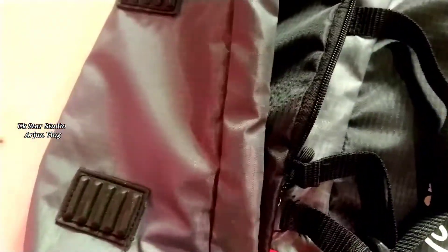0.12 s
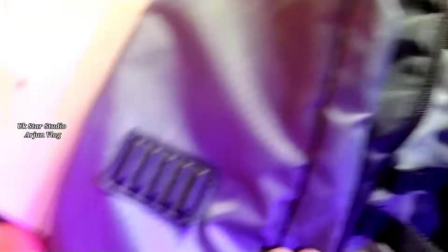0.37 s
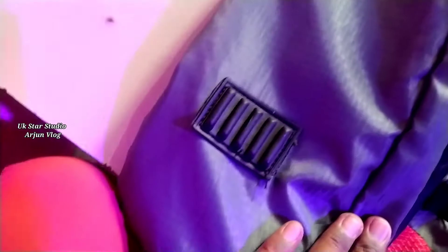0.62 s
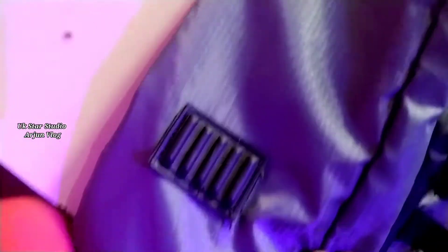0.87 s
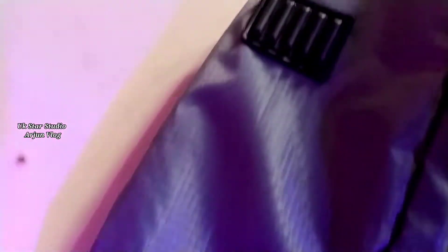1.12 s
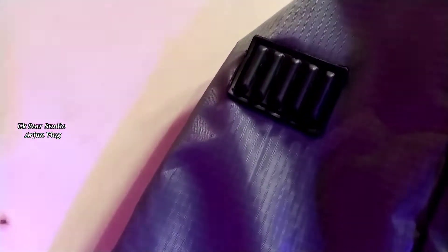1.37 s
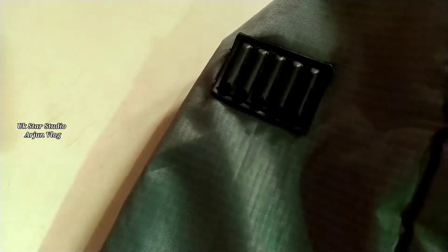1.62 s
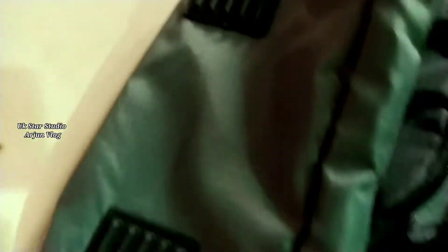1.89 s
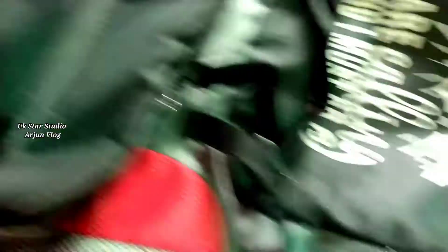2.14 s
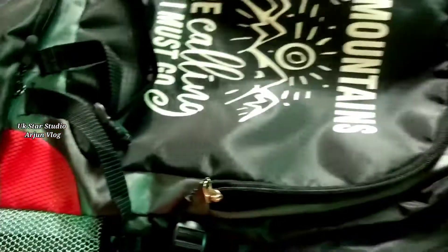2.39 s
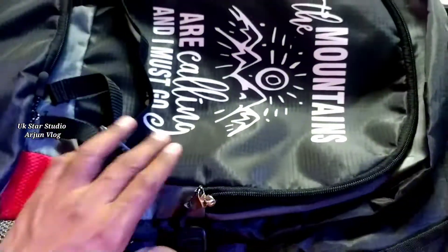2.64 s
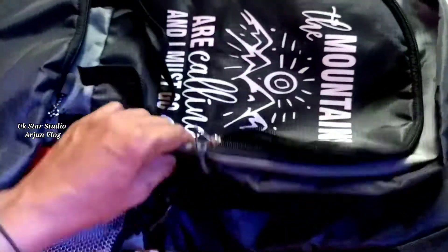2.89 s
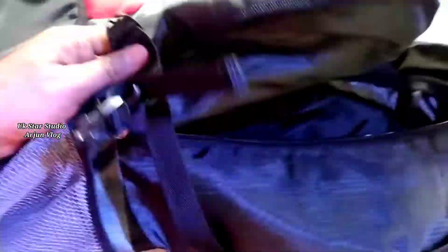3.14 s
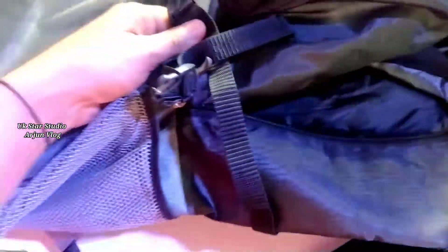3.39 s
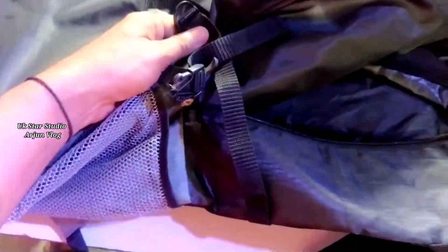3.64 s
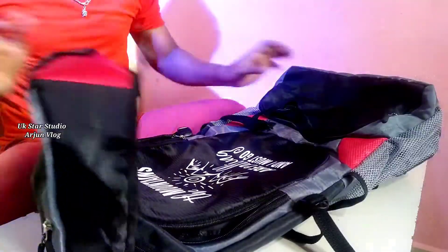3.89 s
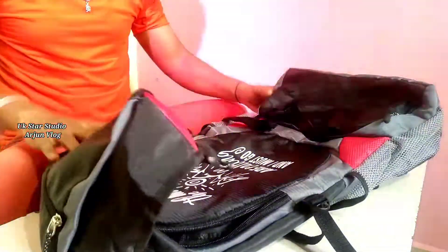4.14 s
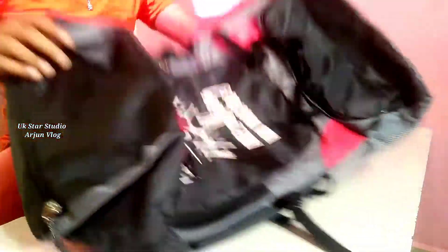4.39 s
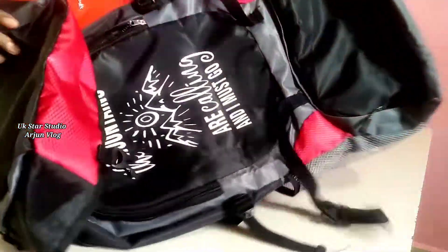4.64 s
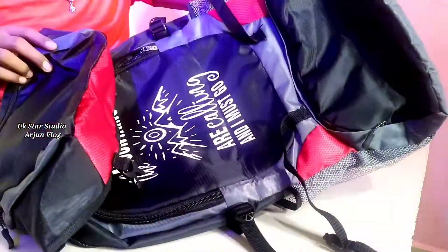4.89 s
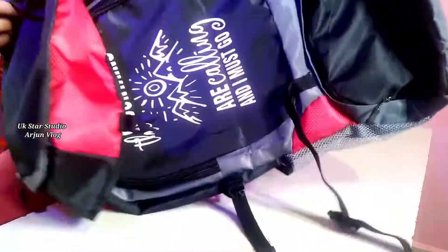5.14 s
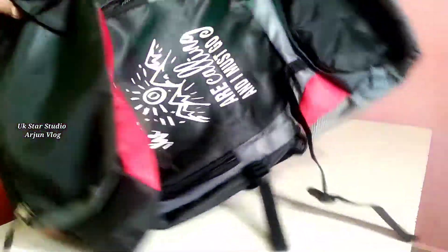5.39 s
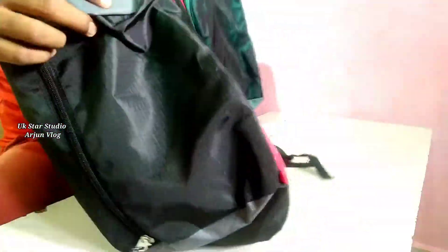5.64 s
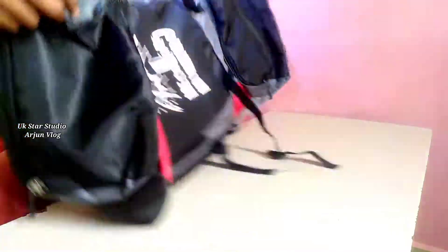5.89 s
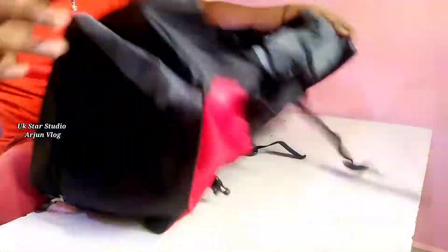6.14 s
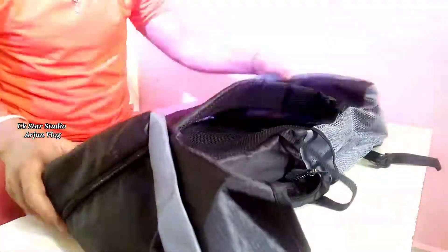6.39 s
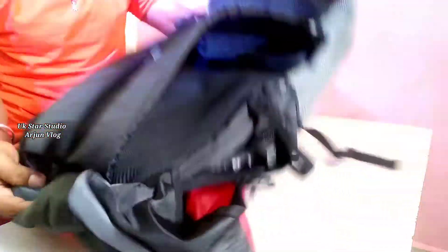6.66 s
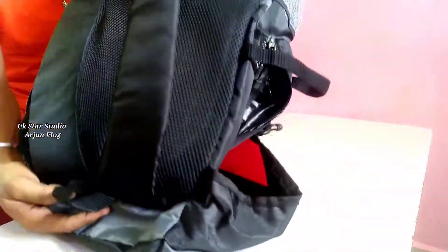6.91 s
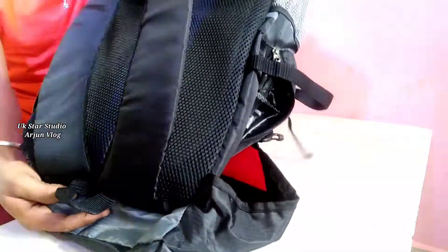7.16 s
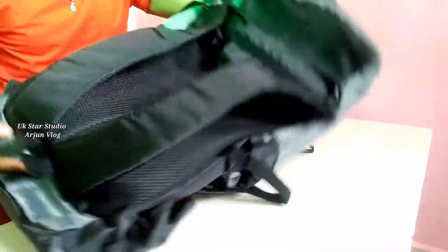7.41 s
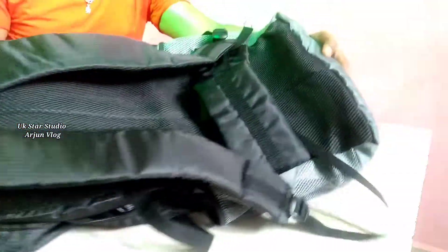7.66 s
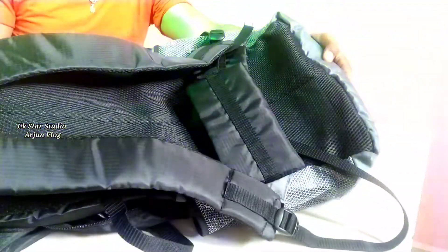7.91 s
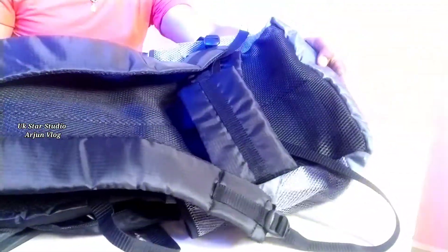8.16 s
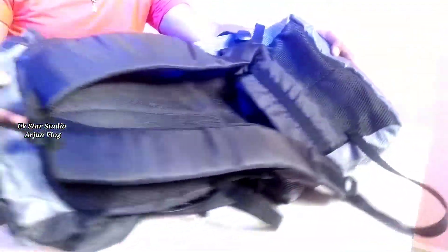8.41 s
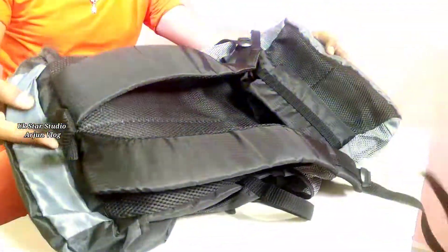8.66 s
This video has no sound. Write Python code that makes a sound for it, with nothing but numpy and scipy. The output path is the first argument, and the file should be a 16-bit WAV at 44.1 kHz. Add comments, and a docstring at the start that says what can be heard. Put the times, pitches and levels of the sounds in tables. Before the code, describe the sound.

A nylon bag rustles and creases under moving hands, first slowed and low, then faster and crisper, with buckle knocks and zip-pull clicks on a table.

```python
"""A nylon bag is turned and opened by hand on a hard table in a small bare room, heard by two microphones.
Stick-slip clicks excite bag body, creases and weave; blows of bag, buckles and zip pulls are filtered pulses.
Sparse decaying reflections form the room, over shaped noise for its air and a low machine drone.
The first stretch plays slowed down, so its handling sounds lower and its tails last longer."""
import sys
import numpy as np
from scipy import signal
from scipy.fft import rfft, irfft
from scipy.io import wavfile
from scipy.ndimage import uniform_filter1d

SR = 44100
rng = np.random.default_rng(int(sys.argv[2]) if len(sys.argv) > 2 else 0)


def file_out(sig):
    """Save sig as 16-bit WAV at sys.argv[1]."""
    # one column per channel
    cols = np.atleast_2d(sig).T
    # limit, then scale
    lim = np.clip(cols, -1, 1)
    pcm = np.round(lim * 32767).astype(np.int16)
    wavfile.write(sys.argv[1], SR, pcm)


def undo_db(level):
    """Turn decibels back into plain size, where 20 dB means ten times bigger."""
    steps = np.asarray(level, float) / 20
    return 10 ** steps


N = 387198
CUT_S = 3.86  # the slowed stretch gives way to full speed


def read(points, hz, column=1):
    """Pitch-like scaling: a table column is interpolated along log frequency."""
    columns = np.transpose(points)
    return np.interp(np.log(hz + 1), np.log(columns[0] + 1), columns[column])


def evened(x):
    """Power normalization: scales a signal to rms 1."""
    return x / np.sqrt(np.mean(x ** 2) + 1e-20)


def colour(points, pace):
    """Minimum phase: the Hilbert transform of log gain gives a causal impulse response, here of energy 1."""
    hz = abs(np.fft.fftfreq(8192, 1 / SR)) / pace
    log_gain = np.log(undo_db(read(points, hz)))
    spectrum = np.exp(np.conj(signal.hilbert(log_gain)))
    taps = np.fft.ifft(spectrum).real[:4096]
    return taps / np.linalg.norm(taps)


def paired(two, pace):
    """Spatial coherence: blends two unrelated channels so that they agree more in the bass."""
    # left-right coherence: (frequency at full speed [Hz], likeness [0 to 1])
    likeness = [(60, 0.53), (300, 0.64), (640, 0.86), (1400, 0.13), (2500, 0.14)]
    left, other = rfft(two, axis=1)
    hz = np.fft.rfftfreq(two.shape[1], 1 / SR) / pace
    same = np.clip(read(likeness, hz), 0, 1)
    right = same * left + np.sqrt(1 - same ** 2) * other
    return irfft([left, right], two.shape[1], axis=1)


def crackle(per_s, spread_db):
    """Stick-slip: fibres catch and let go in random clicks, a few of them large."""
    size_db = spread_db * np.minimum(rng.exponential(1, N), 5)
    clicks = undo_db(size_db) * rng.choice([-1., 1.], N)
    return evened(clicks * (rng.random(N) < per_s / SR))


def rubbing(mix_db, pace):
    """Friction: separate slip trains for body, creases and weave share the movement of the hand."""
    # hand movement: (time [s], rustle level [dB], extra weight on the table [dB])
    hand = [(0, -65, -2.5), (.15, -67, 4), (.25, -52.5, -2), (.31, -52, 5), (.4, -55, -2.5),
            (.55, -61, 1.5), (.8, -72.5, 1.5), (1.27, -70.5, 1.5), (1.83, -74, -1), (1.92, -56, 0.5),
            (2.0, -56, -1), (2.05, -47.5, -10.5), (2.16, -56.5, -4), (2.28, -56.5, 3.5),
            (2.399, -54.5, 1.5), (2.52, -64, -9.5), (2.74, -62.5, -5), (2.79, -53.5, 1), (2.86, -44.5, 0),
            (2.95, -46, 1), (3.25, -56.5, 2.5), (3.4, -61, 1.5), (3.8, -61.5, -1.5), (3.88, -64.5, -6),
            (4.07, -73, 10.5), (4.153, -54, 6.5), (4.23, -70, -1), (4.328, -52.5, 0.5), (4.5, -57.5, -3.5),
            (4.65, -60.5, 10), (4.85, -73, 0), (5.08, -75, 5), (5.14, -56.5, 2), (5.22, -56, 0),
            (5.31, -72, 0), (5.43, -60.5, -0.5), (5.75, -57, -4), (6.02, -63, 4.5), (6.11, -55, 5.5),
            (6.23, -56.5, -5), (6.47, -55.5, 2.5), (6.62, -53, 8), (6.78, -53.5, -1.5), (7.0, -64, -2),
            (7.23, -82, 5.5), (7.32, -56, -4), (7.48, -53, -0.5), (7.62, -54, 0), (7.86, -64, -2),
            (7.99, -86, 6), (8.12, -68.5, 2.5), (8.27, -75, 2), (8.36, -60.5, -5), (8.51, -51.5, -13),
            (8.68, -63.5, -8), (8.78, -66, 3)]
    rest_db = -55
    follow = 0.82, 1.4, 1  # share of the rustle's swing around rest taken by body, creases, weave
    fold_share = 0.44  # weight also deepens the creases
    time_s, rustle_db, weight_db = np.transpose(hand)
    t = np.arange(N) / SR
    levels_db = [rest_db + db + share * (rustle_db - rest_db) for db, share in zip(mix_db, follow)]
    levels_db[0] += weight_db
    levels_db[1] += fold_share * weight_db
    jerks = uniform_filter1d(rng.standard_normal((4, N)), round(SR * 0.03 / pace), axis=1)
    uneven = undo_db(1.6 * evened(jerks[0]) + 2.0 * evened(jerks[1:]))  # partly shared, partly each layer's own
    slips = [
        crackle(1500 * pace, spread_db=3.5),
        crackle(4000 * pace, spread_db=4.5),
        crackle(8000 * pace, spread_db=4.5),
    ]
    return [undo_db(np.interp(t, time_s, db)) * jerk * slip for db, jerk, slip in zip(levels_db, uneven, slips)]


def walls(pace, wet_db):
    """Reverberation: direct sound plus sparse reflections, each band decaying at its own rate."""
    # room decay: (frequency at full speed [Hz], t60 at full speed [s], relative starting level [dB])
    decay = [(150, 0.45, -11), (485, 0.27, 2.5), (1520, 0.24, -2.5), (3960, 0.17, -0.5),
             (11900, 0.19, -3.5)]
    lag_s = 9e-5  # at full speed: the source is nearer the right microphone
    taps = np.zeros((2, SR))
    # one reflection in every 20 samples
    at = np.arange(100, SR - 20, 20) + rng.integers(0, 20, (2, (SR - 101) // 20))
    np.put_along_axis(taps, at, rng.choice([-1., 1.], at.shape), 1)
    hz, t, z = signal.stft(taps, SR, nperseg=256)
    t60_s = read(decay, hz / pace)[:, None]
    start_db = read(decay, hz / pace, column=2)[:, None]
    tail = signal.istft(z * undo_db(start_db - 60 * t * pace / t60_s), SR, nperseg=256)[1]
    tail = paired(tail, pace)
    tail *= undo_db(wet_db) / np.linalg.norm(tail, axis=1, keepdims=True)  # energy against the direct sound
    tail[0, round(lag_s * SR / pace)] += 1
    tail[1, 0] += 1
    return tail / np.linalg.norm(tail[0])


def room(dry, pace, wet_db):
    """Changing image sources: the bag shifts about, so its sound drifts among three sets of reflections."""
    turn = 2 * np.pi * 3.0 * pace * np.arange(N) / SR  # 3 turns a second at full speed
    heard = 0
    for k in range(3):
        share = (1 + np.cos(turn + 2 * np.pi * k / 3)) / 3
        heard = heard + signal.fftconvolve((dry * share)[None], walls(pace, wet_db), axes=1)[:, :N]
    return heard


def air(points, db, pace):
    """Broadband noise: steady room air with a shaped spectrum, gently patchy in time and frequency."""
    frames, hz = N // 512 + 5, np.fft.rfftfreq(2048, 1 / SR)
    a, b, c, d, patches = rng.standard_normal((frames, 1025, 5)).T
    patches = uniform_filter1d(patches, 8, 0)
    patches = evened(uniform_filter1d(patches, 10, 1))
    gain = undo_db(read(points, hz)[:, None] + 2.0 * patches)
    z = np.array([a + 1j * b, c + 1j * d]) * gain
    noise = signal.istft(z, nperseg=2048, noverlap=1536)[1][:, :N]
    return undo_db(db) * evened(paired(noise, pace))


def drone(db, pace):
    """Narrow-band noise: a distant machine's low drone wanders in level, alike in both microphones."""
    hz, width_hz = 68 * pace, 7.2 * pace
    r = np.exp(-np.pi * width_hz / SR)
    noise = rng.standard_normal(N) + 1j * rng.standard_normal(N)
    swing = signal.lfilter([1], np.convolve([1, -r], [1, -r]), noise)
    carrier = np.exp(2j * np.pi * hz * np.arange(N) / SR)
    return undo_db(db) * evened((swing * carrier).real)


def blows(pace):
    """Impact: gathers the blows of the stretch at this speed, each with the pitch of its struck part."""
    # Blows on the table, in three tables with the same columns: (time [s], crack drive [dB],
    # body [dB re crack drive], tick [dB re crack drive], rattle [dB re push])
    # the padded bag bumps the table
    bumps = [(0.286, -34.5, 1, 4, -20.5), (0.386, -27, -4, -24, -36), (1.964, -39.5, 6, -13, -24),
             (1.991, -48, -32, -4, -42), (2.43, -46, 11, -20, -31), (2.815, -29.5, 0, -12, -24),
             (2.85, -31.5, 1.5, -2, -13), (2.896, -30.5, -13, 16, -21.5), (4.0901, -43, 3.5, -28, -17),
             (4.256, -49.5, 8.5, -20, -11.5), (4.4565, -38, -3, -25, -25), (6.5145, -38, -2.5, 5, -13.5),
             (6.5857, -35.5, 2, -8.5, -11.5), (6.6617, -31.5, -4, -13, -32), (6.6876, -32, -11, -9, -30),
             (7.2714, -49.5, 1, -23, -15.5)]
    # plastic buckles knock
    buckles = [(2.125, -27.5, -1, -25, -42), (2.183, -16, -10.5, -32, -44), (2.76, -43, -31, -9, -20),
               (4.5609, -31.5, -12, 17, -23), (4.714, -18, -6, -43, -14), (5.3817, -43.5, -19, 12, -14),
               (6.0406, -31.5, -15, 14.5, -19.5), (6.2596, -16, -4, -40, -15), (6.3244, -21, -32, -27, -24),
               (7.4205, -19.5, -11.5, 9, -18), (7.8974, -40, -2, 11.5, -25.5)]
    # metal zip pulls click
    pulls = [(0.657, -46, -11, 14, -28), (1.56, -41, -25, -32, -23), (2.391, -55, -6, 21, -34),
             (5.2958, -29, -23, 20.5, -24), (5.6153, -18.5, -11.5, 9, -20.5), (6.045, -22.5, -32, -10, -18),
             (6.1494, -18.5, -12.5, 2.5, -18), (6.283, -15.5, -20, 0, -16.5), (6.3672, -22.5, -7, 7, -14),
             (6.4454, -40, -21, 20.5, -23), (7.0798, -64, 6, 31.5, -22), (7.3886, -23.5, -12.5, 1, -11)]
    parts = (bumps, 990), (buckles, 2590), (pulls, 4640)  # crack pitch at full speed [Hz]
    return [(*row, hz * pace) for rows, hz in parts for row in rows if (row[0] < CUT_S) == (pace < 1)]


def knocks(rows, pace):
    """Impulse and resonance: a first touch, one sharp push with its thud, a grainy rattle of the loose part."""
    t = np.arange(round(.08 * SR / pace)) * pace / SR  # time at full speed
    grain, size = rng.standard_normal((2, len(rows), len(t)))
    rattles = grain * undo_db(4 * size - 60 * t / .04)  # falls 60 dB in 40 ms at full speed
    push = round(.0012 * SR / pace)  # the push follows the first touch
    drives = np.zeros((4, N))
    for (s, crack_db, body_db, tick_db, rattle_db, hz), rattle in zip(rows, rattles):
        blow = undo_db(rattle_db) * rattle
        blow[push] = 1
        blow *= undo_db(crack_db) * np.sqrt(SR / 4000)
        # the struck part favours its own pitch
        crack = signal.lfilter(*signal.iirpeak(hz, 1, SR), blow) + .12 * blow
        crack *= np.linalg.norm(blow) / np.linalg.norm(crack)
        at = round(s * SR)
        drives[:3, at:at + len(t)] += [undo_db(body_db) * blow, crack, undo_db(tick_db) * blow]
        drives[3, at + push] += undo_db(body_db) * blow[push]  # thud
    return drives


def stretch(mix_db, pace, rub_wet_db, blow_wet_db):
    """Source and filter: rubbing and blows at one speed; rubbing spreads over the whole bag, so it is wetter."""
    # Response spectra, in four tables: (frequency at full speed [Hz], relative level [dB per Hz])
    # bag body
    body = [(90, -36), (135, -3), (200, -13.5), (340, -6.5), (420, -4.5), (520, -2), (610, -5.5), (720, -4),
            (860, -1.5), (960, -21), (1500, -37), (3000, -31)]
    # creasing cloth
    crease = [(400, -35), (900, -2), (1500, 0), (2300, -1), (3400, -2), (4800, -2), (5600, -6),
              (12000, -9.5)]
    # hiss of the weave
    weave = [(1500, -16), (4000, -3), (6500, -3.5), (9000, -6), (12000, -2), (15000, 4.5), (19000, 4)]
    # the padded table gives way once, without ringing
    thud = [(90, -16), (140, -8), (230, -15.5), (450, 4), (1600, -25.5)]

    def heard(drives, wet_db):
        """Convolution: colours the drives and puts them in the room."""
        layers = zip(drives, (body, crease, weave, thud))  # rubbing has no thud
        bag = sum(signal.oaconvolve(drive, colour(points, pace))[:N] for drive, points in layers)
        return room(bag, pace, wet_db)

    return heard(rubbing(mix_db, pace), rub_wet_db) + heard(knocks(blows(pace), pace), blow_wet_db)


def stepped(x, hz, db):
    """Shelving filter: shifts the level of everything above hz by db."""
    below = signal.oaconvolve(x, signal.firwin(401, hz, fs=SR)[None], "same")
    return below + undo_db(db) * (x - below)


def scene():
    """Superposition: the slowed stretch, then a short cross-fade to the one at full speed."""
    # Quiet room air, one table a stretch: (frequency as heard [Hz], relative level [dB per Hz])
    # air of the slowed stretch
    slow_air = [(15, -46), (25, -7.5), (256, -8), (358, -17), (407, -19), (555, -23.5), (979, -22.5),
                (1410, -30.5), (1730, -31), (4500, -38.5), (12000, -67.5), (15600, -60), (22000, -120)]
    # air at full speed
    full_air = [(29, -76), (50, -7.5), (250, -10), (325, -9.5), (538, -10.5), (829, -24.5), (1030, -21.5),
                (1880, -23), (2960, -24.5), (5020, -26), (5390, -31), (15500, -28.5)]
    slow_pace = .6
    # mix_db: offsets of body, creases and weave
    slow = stretch((-1.5, 6.5, 11.5), slow_pace, rub_wet_db=5, blow_wet_db=-1)
    slow += air(slow_air, -59, slow_pace) + drone(-72, slow_pace)
    slow = stepped(slow, hz=12250, db=-15)
    full = stretch((-2, 7, 6), 1, rub_wet_db=7, blow_wet_db=4)
    full += air(full_air, -62.5, 1) + drone(-76, 0.98)
    late = np.clip((np.arange(N) / SR - CUT_S) / 0.0099 + .5, 0, 1)  # 9.9 ms cross-fade
    return stepped((1 - late) * slow + late * full, hz=15600, db=-26)


def roll_off(x):
    """The treble ends steeply here."""
    return signal.sosfilt(signal.butter(12, 16640, fs=SR, output="sos"), x)


def record(dry):
    """Signal chain: the finished two-channel mix passes to its last stage."""
    return roll_off(dry)


dry = scene()
out = record(dry)
file_out(out)
```